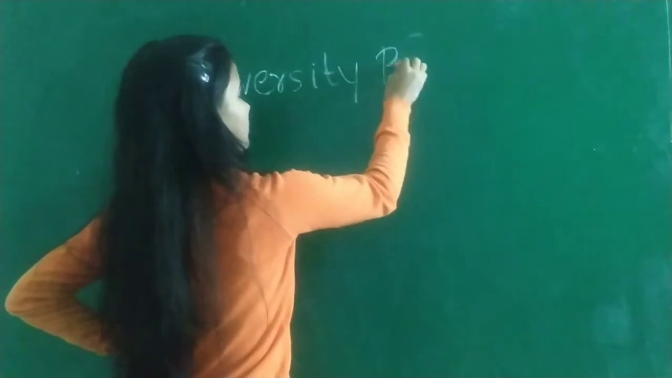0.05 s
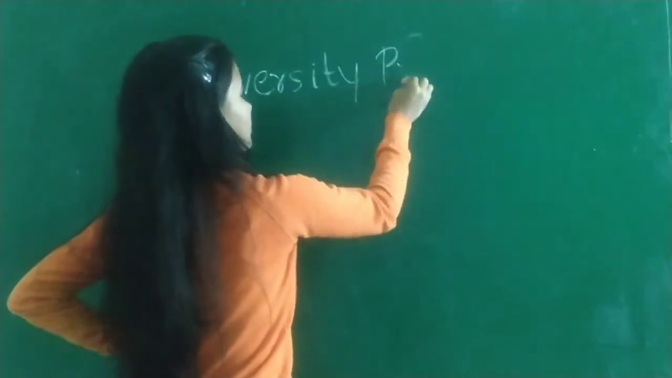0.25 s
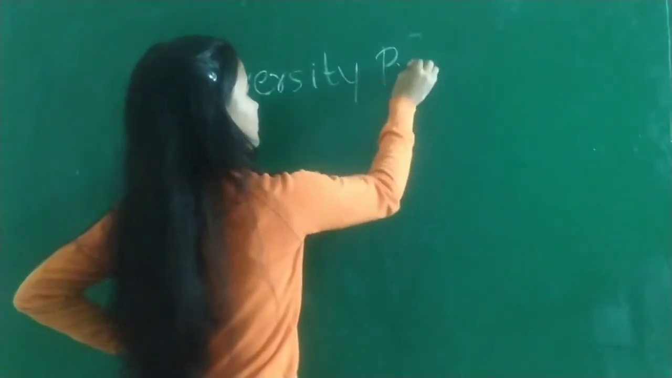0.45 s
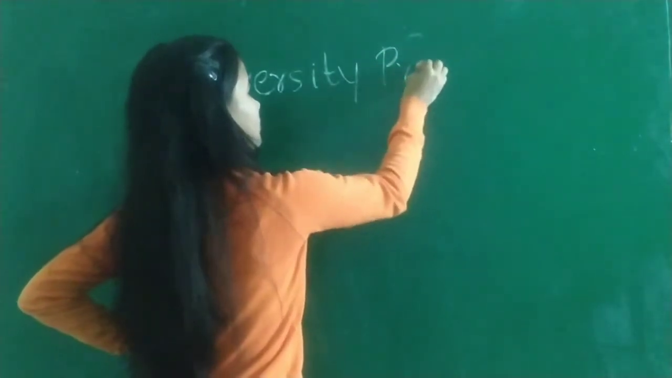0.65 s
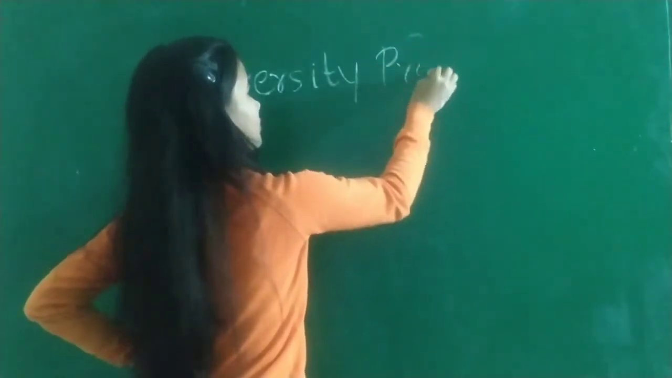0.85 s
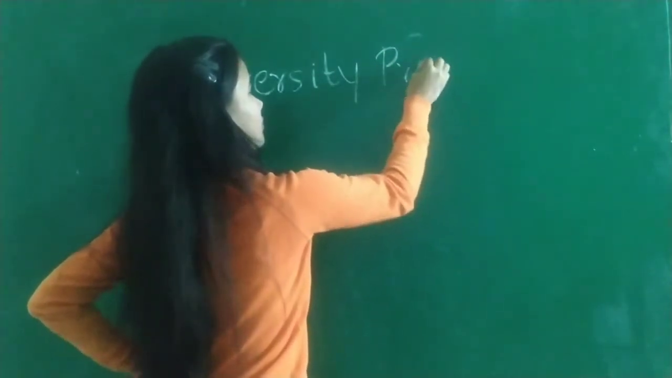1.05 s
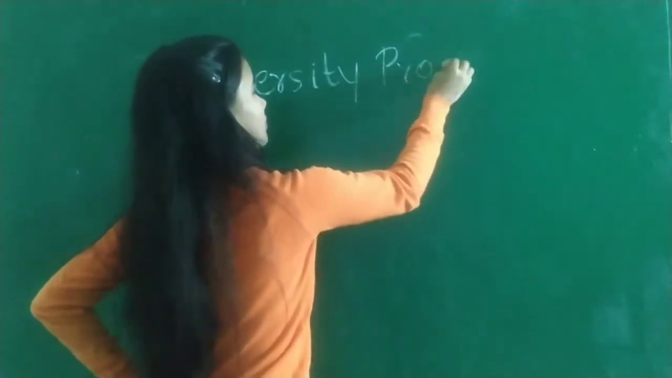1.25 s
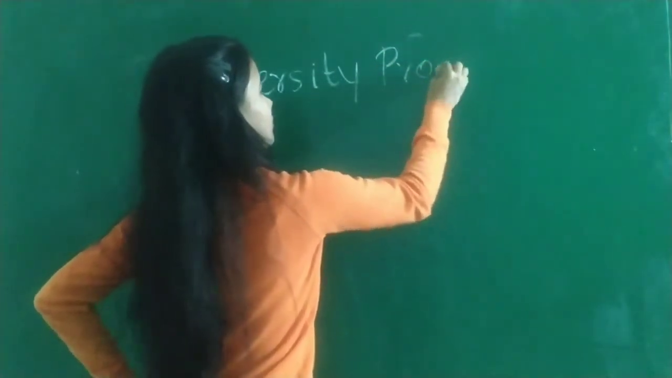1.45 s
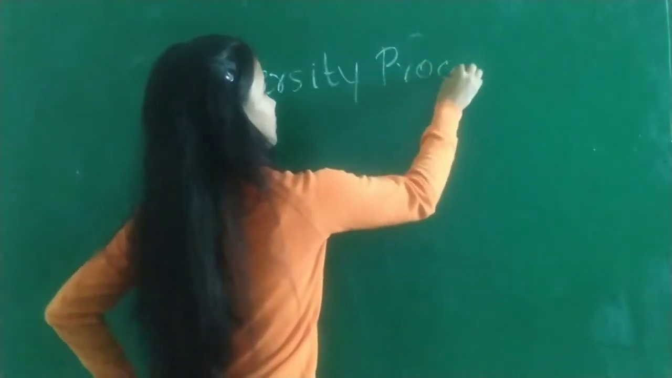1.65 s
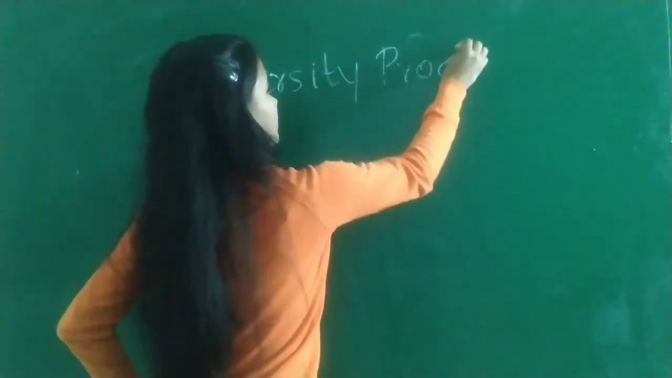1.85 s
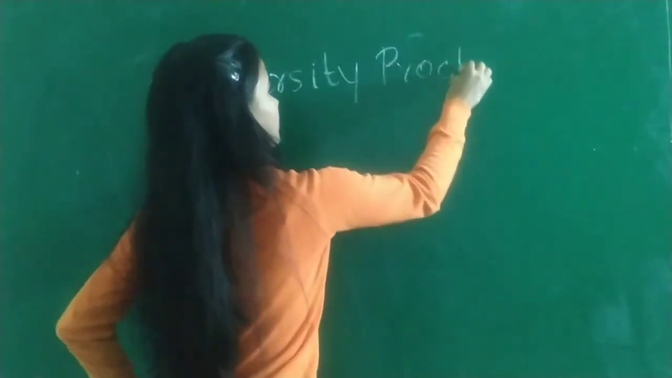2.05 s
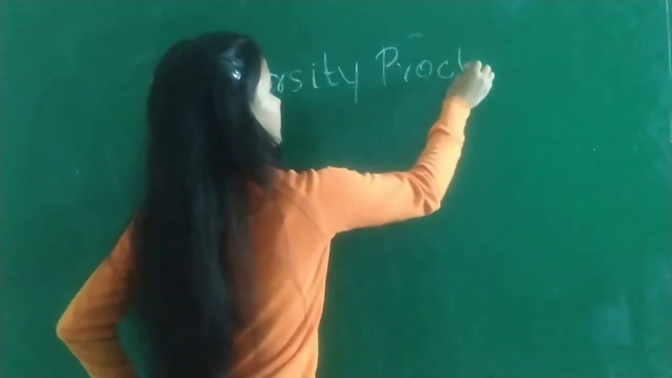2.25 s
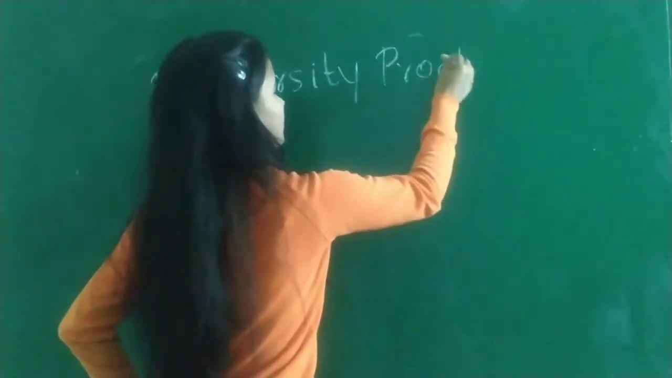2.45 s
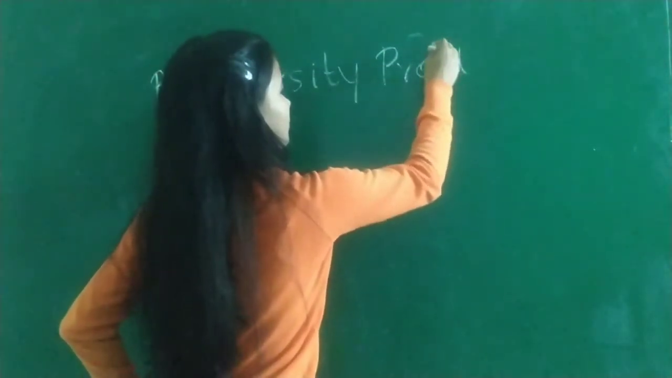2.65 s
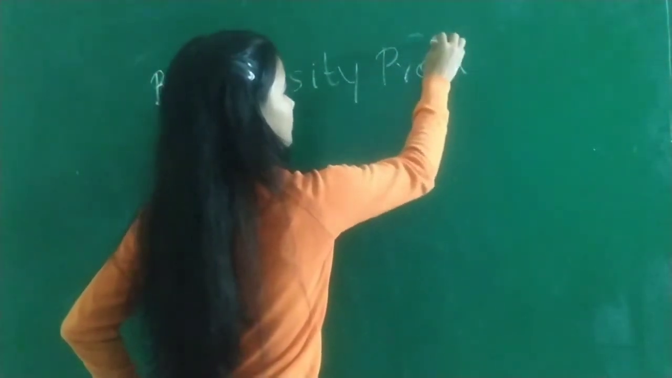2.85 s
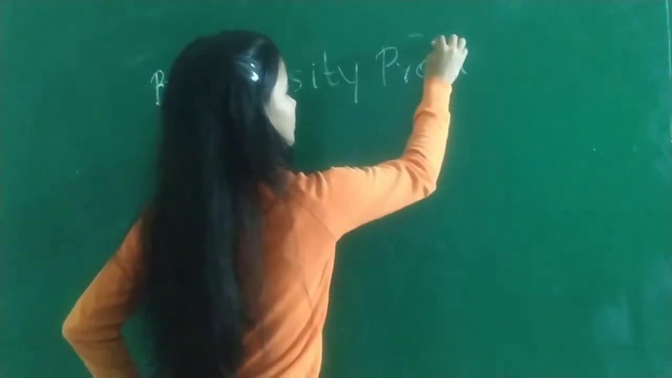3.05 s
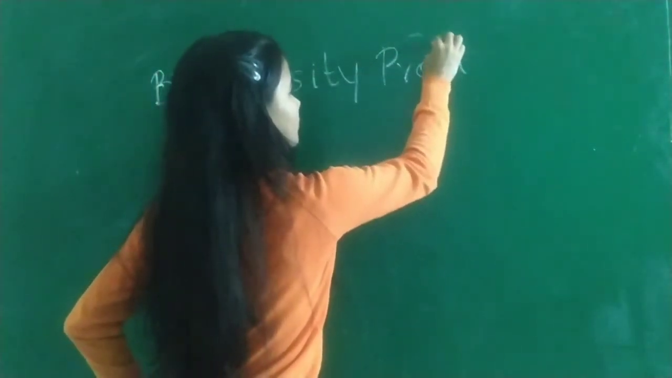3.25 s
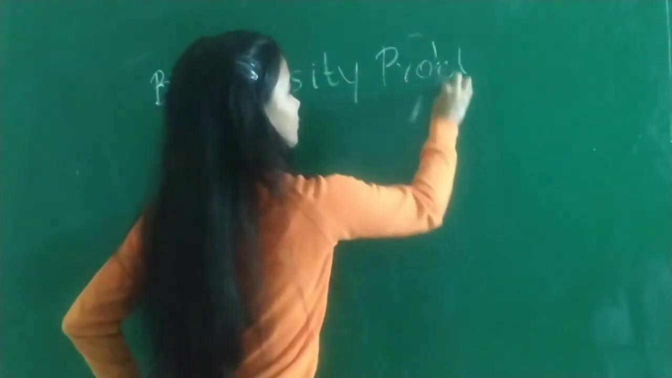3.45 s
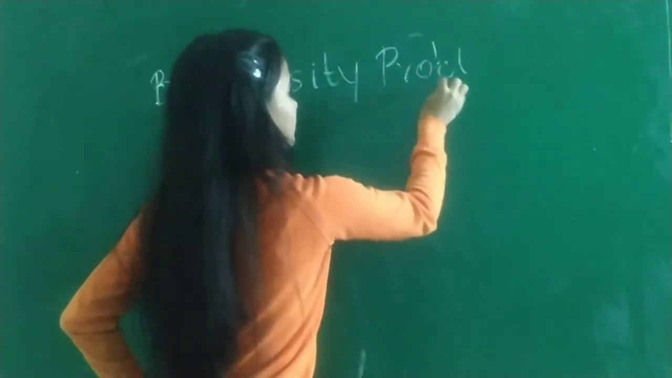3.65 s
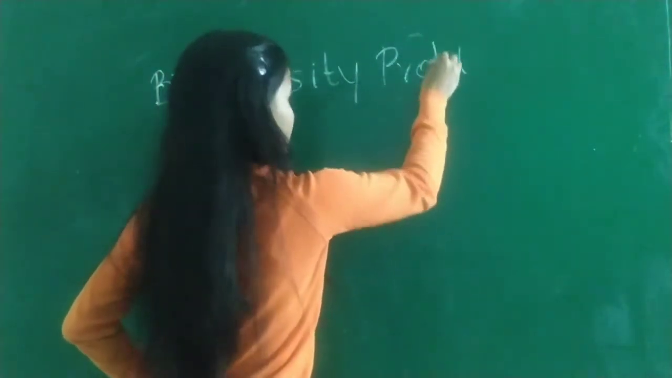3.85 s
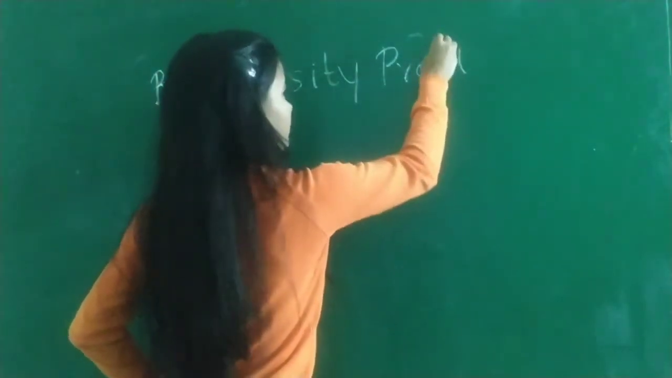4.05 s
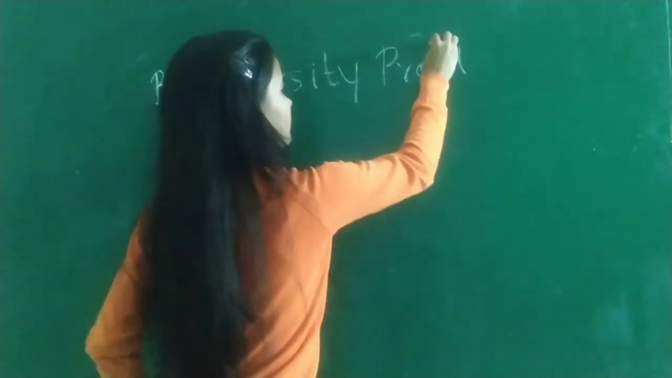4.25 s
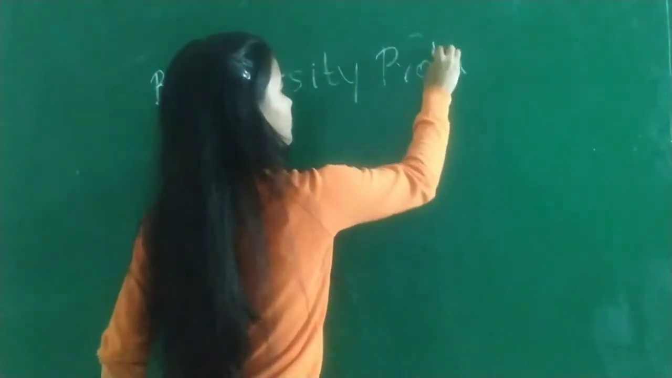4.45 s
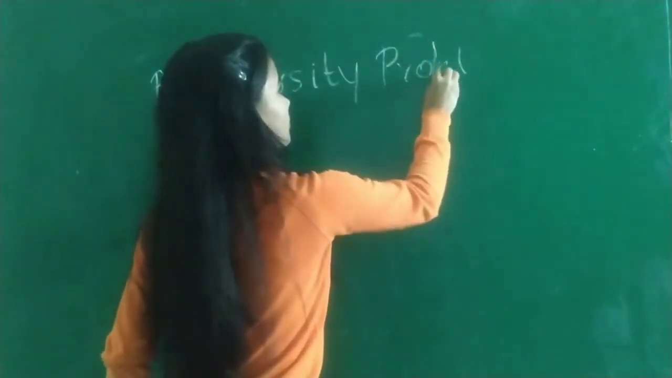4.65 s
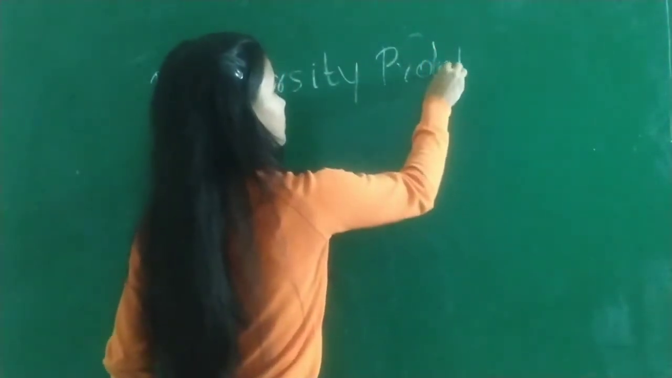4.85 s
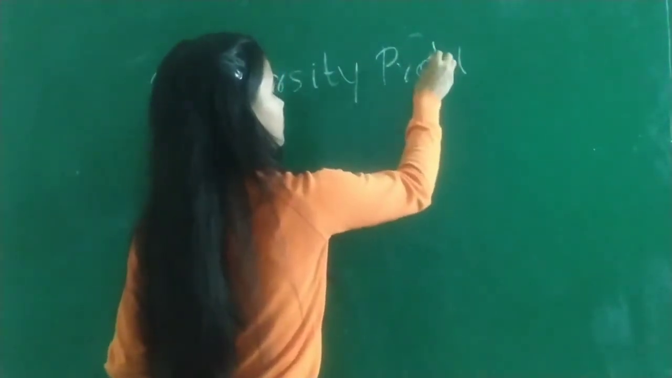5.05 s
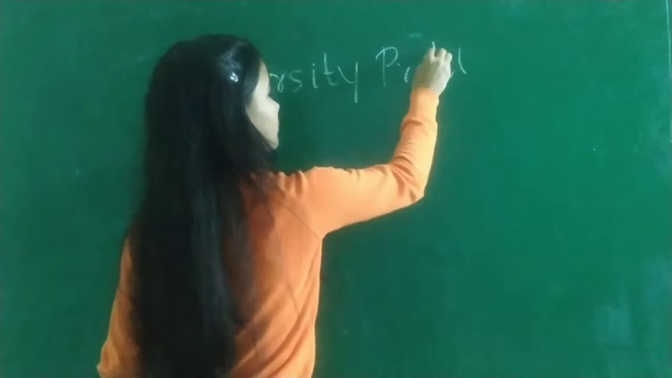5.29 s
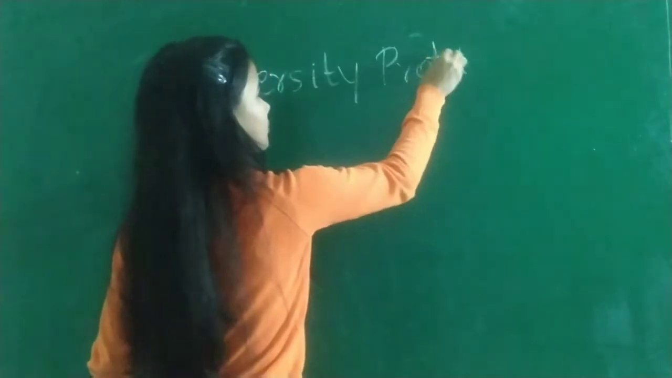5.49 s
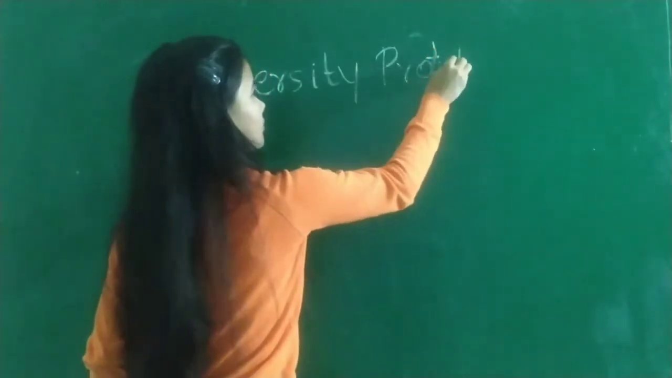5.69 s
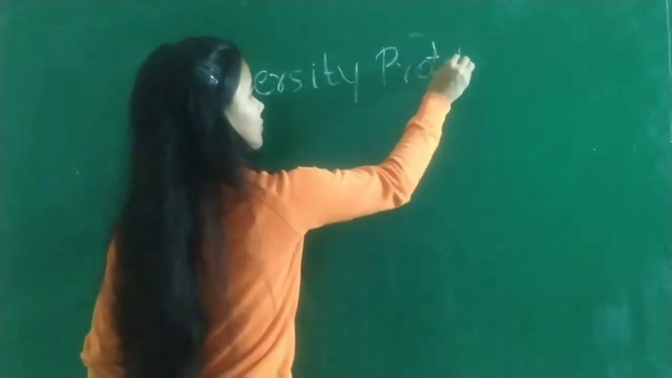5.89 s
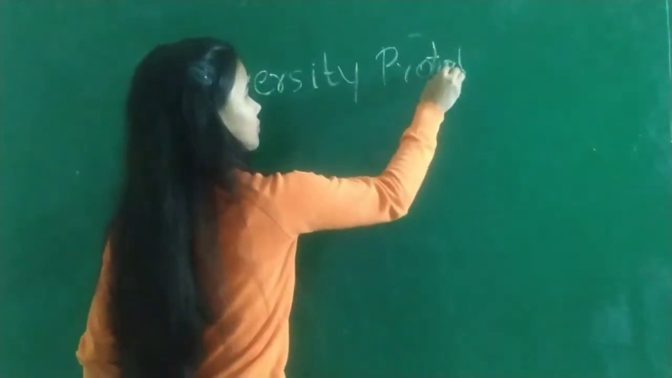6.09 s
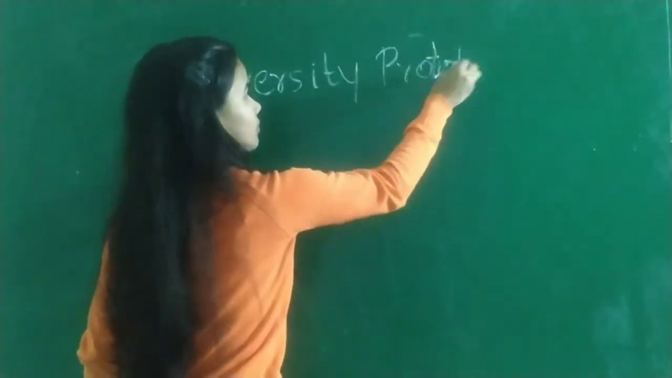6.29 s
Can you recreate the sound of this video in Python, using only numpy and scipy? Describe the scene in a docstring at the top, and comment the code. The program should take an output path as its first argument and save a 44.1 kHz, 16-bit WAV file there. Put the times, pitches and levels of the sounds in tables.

```python
"""In a bare, echoing classroom, chalk writes on a wall-mounted board, heard through one small microphone.
Each stroke lands with a knock and drags with a gritty hiss as tiny grains break off and shake the stick
and the board. The stick snaps, the broken end drops and bounces, and something soft brushes over the board.
Behind it all are far noise, microphone hiss and the faint hum of the room's low resonances."""
import sys
import numpy as np
from scipy import signal
from scipy.fft import rfft, irfft
from scipy.io import wavfile

SR = 44100
rng = np.random.default_rng(int(sys.argv[2]) if len(sys.argv) > 2 else 0)


def log_audio(samples):
    """Write samples as a 16-bit WAV file to the path given in sys.argv[1]."""
    # one column per channel
    frames = np.atleast_2d(samples).T
    # limit to full scale, then quantise
    limited = np.clip(frames, -1, 1)
    pcm = np.round(limited * 32767).astype(np.int16)
    wavfile.write(sys.argv[1], SR, pcm)


N = 278976
BLOW_SAMPLES = 4096
BLOW_MS = np.arange(BLOW_SAMPLES) / SR * 1000   # the time since a blow began

# Chalk hitting the board, the snap included. Each row: start in seconds, knock peak in dB, crack peak in dB,
# contact time in ms, pitch of the struck spot in Hz, its peak in dB, treble lift in dB per octave.
TAPS = [(0.0428, -19, -27.5, 0.057, 1130, -21, 20.5), (0.6310, -19, -24.5, 0.12, 860, -22.5, 24),
        (1.158, -50, -45, 0.045, 1500, -60, 0), (1.2762, -21.5, -39.5, 0.1, 1060, -25, 9),
        (1.705, -48, -47, .05, 1500, -60, 0), (1.8572, -15, -31.5, 0.065, 1300, -16.5, 2.5),
        (2.8063, -52, -54, 0.13, 1500, -65, 0), (2.8745, -24.5, -57, 0.11, 890, -30, 7),
        (3.3815, -15, -25.5, 0.078, 1250, -15, 14), (3.3870, -7, -18, 0.15, 780, -9.5, 8),
        (3.4085, -41, -44, .05, 1100, -45, 0), (4.471, -58, -46, .05, 1500, -56, -2),
        (5.2352, -18.5, -53, 0.13, 745, -27, 5), (5.605, -23.5, -45.5, 0.074, 1080, -29.5, 0)]
# The board's modes, the tones it rings at. Each row: pitch in Hz, width in Hz, relative level in dB.
BOARD_MODES = [(218, 20, -14.5), (334.5, 20, -3), (633, 57, -13), (763, 81, -4.5), (928, 155, -6),
               (1068, 350, 1.5), (1221, 29, 1), (1311, 23, -4.5), (1386, 56, -2), (1518, 39, -1.5),
               (1648, 112, -5.5), (1860, 60, -6), (2024, 59, -6.5), (2360, 57, -13), (2820, 630, -16.5)]


def chalk_strokes():
    """The dragging tip hisses, rings the stick and shakes the board, all unsteady as pressure wavers."""
    # Each row: moment of top speed in seconds, rise and fall in seconds, bright hiss level in dB, then
    # dull scrape, stick and board in dB compared with that hiss, and hardness of contact from 0 to 1.
    strokes = [(0.15, 0.18, 0.13, -61.5, -9, -2, 15.5, 0.7), (0.405, 0.1, 0.051, -59.5, 0, 0, 20, 0.61),
               (0.53, .025, 0.034, -75.5, -1, 5, 6, 0.86), (0.73, 0.15, 0.099, -64, -11, -5, 18.5, 0.43),
               (0.805, 0.067, 0.11, -62.5, -1, 1.5, 12.5, 0.5),
               (0.905, 0.072, 0.069, -58.5, -9, -10, 21, 0.49),
               (0.965, 0.068, 0.08, -63, -7, -1, 26.5, 0.67), (1.085, 0.068, 0.075, -61.5, -4, 2, 10, 0.75),
               (1.162, 0.013, 0.012, -69.5, 9.5, 9, 16, 0.7), (1.31, 0.031, 0.062, -77, -6, 7, 36.5, 0.48),
               (1.453, 0.072, 0.12, -66.5, -10, -3, 22, 0.24),
               (1.566, 0.19, 0.029, -61.5, 2.5, 1, 14.5, 0.7),
               (1.685, 0.16, 0.034, -64, -5.5, -3, 16.5, 0.8), (2.035, 0.16, 0.16, -59, -6, 1, 17, 0.79),
               (3.377, 0.11, 0.033, -58, -18, -4, 10, 0.73),
               (3.411, 0.0073, 0.08, -52.5, -1, -8, 21.5, 0.64),
               (4.49, 0.23, 0.11, -71.5, -3, 2, 14.5, 0.34), (4.585, 0.14, 0.074, -65, 0, 5, 24, 0.3),
               (4.75, 0.073, 0.025, -64.5, -4, 3, 18, 0.4), (5.805, 0.11, 0.036, -71.5, -6, 0, 23.5, 0.8),
               (5.903, 0.03, 0.12, -68.5, 3, 5, 20, 0.53), (6.099, 0.078, 0.056, -65, 1, 6.5, 25, 0.51)]
    # The bright hiss shifts as the tip turns. Each row: time in seconds, pitch in Hz.
    tip_pitch = [(0, 11000), (.19, 11500), (.36, 11800), (.42, 11000), (.72, 11500), (.81, 10300),
                 (.86, 11400), (.91, 11800), (1.0, 11800), (1.08, 11300), (1.16, 10000), (1.31, 11600),
                 (1.44, 12100), (1.52, 11000), (1.58, 9830), (1.62, 10500), (1.7, 12000), (2.0, 12000),
                 (3.4, 10600), (4.45, 11000), (4.6, 10000), (4.75, 11000), (6.33, 11100)]
    # The tones of the dragged stick. Each row: pitch in Hz, width in Hz, relative level in dB.
    stick_modes = [(3570, 3500, 14.5), (5330, 320, -5), (5790, 1350, 8.5), (6940, 1100, 1.5)]
    jolts = grit(per_s=2500, spread_db=2.5) * from_db(2.5 * drift(rate_hz=45.7))
    shaken = radiated(body(np.diff(jolts, prepend=0), BOARD_MODES))
    soft = rms_one(cut(shaken, 1000, "low", order=4))   # a soft drag drives only the low tones
    hard = rms_one(cut(shaken, 2050, "low", order=4))
    dull = double_resonance(catching_grit(per_s=9000), hz=8600, width_hz=6200)
    bright = gliding_resonance(catching_grit(per_s=7600), in_time(tip_pitch), width_hz=4100)
    stick = rms_one(body(body(catching_grit(per_s=12000), stick_modes), stick_modes))
    out = np.zeros(N)
    for top_s, rise_s, fall_s, tip_db, dull_db, stick_db, board_db, hardness in strokes:
        board = (1 - hardness) * soft + hardness * hard
        scrape = bright + from_db(dull_db) * dull + from_db(stick_db) * stick + from_db(board_db) * board
        out += sweep(top_s, rise_s, fall_s, tip_db) * scrape
    return out * from_db(1.6 * drift(rate_hz=20))


def grit(per_s, spread_db):
    """Grains of chalk break off at random moments in uneven sizes."""
    sizes = from_db(spread_db * np.minimum(rng.exponential(1, N), 5)) * rng.choice([-1, 1], N)
    return rms_one(sizes * (rng.random(N) < per_s / SR))


def catching_grit(per_s):
    """Grit whose strength jumps as the tip catches and lets go."""
    return grit(per_s, spread_db=2.0) * from_db(2.2 * drift(rate_hz=16))


def chalk_taps():
    """A brief push knocks the board, a little differently each time; the hard edge cracks in the stick."""
    # The tones of the struck stick. Each row: pitch in Hz, width in Hz, relative level in dB.
    crack_modes = [(3850, 1500, -8), (4970, 250, -6), (5500, 920, -4), (6400, 360, -1), (7120, 540, -4.5),
                   (8100, 1140, -1), (9700, 1700, -5), (11800, 1300, -7.5), (14100, 2500, -13)]
    lift_from_hz = 1400
    out = np.zeros(N)
    for start_s, knock_db, crack_db, contact_ms, _, _, lift_db in TAPS:
        modes = [(hz, width_hz, db + lift_db * max(np.log2(hz / lift_from_hz), 0) + rng.normal(0, 2.5))
                 for hz, width_hz, db in BOARD_MODES]
        add_blow(out, start_s, knock_db, radiated(body(push(contact_ms), modes)))
        crack = 0
        for k, (hz, width_hz, db) in enumerate(crack_modes):
            gain = (-1) ** k * from_db(db + rng.normal(0, 1.5)) / width_hz ** .5
            crack += gain * resonance(BLOW_MS == 0, hz, width_hz)   # rung by a single click
        add_blow(out, start_s, crack_db, crack)
    return out


def spot_ring():
    """The board around each blow rings on briefly, most near the struck spot's own pitch."""
    # The tones of that part of the board. Each row: pitch in Hz, width in Hz.
    spot_modes = [(740, 74), (1080, 61), (1500, 60), (1800, 120), (2215, 43), (2470, 200), (3040, 79),
                  (3650, 110)]
    loss_db_per_octave = 9
    out = np.zeros(N)
    for start_s, _, _, contact_ms, spot_hz, ring_db, _ in TAPS:
        modes = [(hz, width_hz, -loss_db_per_octave * abs(np.log2(hz / spot_hz)))
                 for hz, width_hz in spot_modes]
        add_blow(out, start_s, ring_db, -body(push(contact_ms, lag_ms=0.34), modes))
    return radiated(out)


def falling_piece():
    """The broken end lands and bounces, with a dry ring of its own and a thud from the floor."""
    # Each row: start in seconds, peak in dB, ring pitch in Hz, ring width in Hz, scuff fade time in ms,
    # thud in dB compared with the ring, thud pitch in Hz.
    # The second row is a quick, bright echo of the first landing.
    ticks = [(3.8779, -25.5, 4080, 2480, 0.013, 2.5, 1500), (3.891, -37, 8450, 3000, 0.045, 3, 2500),
             (3.944, -39, 7000, 2500, .3, 11, 990), (3.9985, -43, 5030, 3000, 0.04, 9, 990),
             (4.1733, -34.5, 6600, 1200, 1.5, 4, 860), (4.1977, -48, 6700, 1000, 1.4, 17, 1210),
             (4.2347, -43, 6850, 1000, 1.0, 18, 1190)]
    out = np.zeros(N)
    for start_s, peak_db, hz, width_hz, scuff_ms, thud_db, thud_hz in ticks:
        scuff = rng.standard_normal(BLOW_SAMPLES) * np.exp(-BLOW_MS / scuff_ms)
        ring = rms_one(resonance(resonance(scuff, hz, width_hz), hz, 2 * width_hz))
        thud = double_resonance(BLOW_MS == 0, thud_hz, width_hz=1160)
        add_blow(out, start_s, peak_db, ring + from_db(thud_db) * thud)
    return out


def brush():
    """Something soft rubs the board with a smooth hiss: one bright pass and one duller one."""
    # Each row: moment of top speed in seconds, rise and fall in seconds, gain in dB, centre pitch in Hz.
    passes = [(5.285, 0.17, 0.21, -47.5, 5940), (5.405, 0.072, 0.037, -44, 2640)]
    below_db, above_db = 24, 20   # loss one octave under and over the centre
    out = np.zeros(N)
    for top_s, rise_s, fall_s, gain_db, centre_hz in passes:
        bands = []
        for hz in np.geomspace(1500, 15000, 10):
            loss_db = above_db if hz > centre_hz else below_db
            bands.append((hz, 0.43 * hz, -loss_db * np.log2(hz / centre_hz) ** 2))
        bands.append((centre_hz, .15 * centre_hz, 1))   # a narrower ring at the centre
        out += sweep(top_s, rise_s, fall_s, gain_db) * body(rng.standard_normal(N), bands)
    return out


def first_echoes(x):
    """Each near surface returns a dull copy of the sound, slightly smeared because it is uneven."""
    # The board's edges, then the nearest surfaces. Each row: delay in seconds, level in dB.
    reflections = [(.0009, -6), (.0053, -10.5), (.0088, -4.5), (0.0102, -11.5), (0.0224, -19),
                   (0.0333, -10.5)]
    smear_ms = 1.0
    pattern = np.zeros(2 * BLOW_SAMPLES)
    for delay_s, db in reflections:
        smear = rng.standard_normal(BLOW_SAMPLES) * np.exp(-BLOW_MS / smear_ms)
        pattern[int(delay_s * SR):][:BLOW_SAMPLES] += from_db(db) * energy_one(smear)
    return cut(signal.fftconvolve(x, pattern)[:N], 3400, "low", order=1)


def room_echo(x):
    """Dense echoes build up after the first wall and die away, fastest in the treble."""
    # Each row: pitch in Hz, seconds the echo takes to fade by 60 dB.
    fade_times = [(150, 0.39), (500, 1.0), (1000, 1), (2800, 0.99), (7000, 0.55), (15000, 0.22)]
    first_echo_s, build_up_s, room_db = 0.0075, 0.018, -4
    t = np.arange(int(1.6 * SR)) / SR
    hz, frame_s, spectrum = signal.stft(rng.standard_normal(len(t)), SR, nperseg=512)
    fade = from_db(-60 * frame_s / at_hz(fade_times, hz)[:, None])
    tail = signal.istft(spectrum * fade, SR, nperseg=512)[1][:len(t)]
    tail *= np.clip((t - first_echo_s) / build_up_s, 0, 1)
    return from_db(room_db) * signal.fftconvolve(x, energy_one(tail))[:N]


def background():
    """Far noise and microphone hiss, with a wavering hum at the room's resonances."""
    # The tone of the noise and hiss. Each row: pitch in Hz, relative level in dB.
    noise_shape = [(30, -35), (80, -28.5), (100, -19), (160, -7), (250, -2), (400, -11.5), (630, -11.5),
                   (1000, -17.5), (2000, -23), (4000, -31), (8000, -34.5), (13000, -35), (16000, -33.5)]
    # The room's resonances. Each row: pitch in Hz, width in Hz, base level in dB.
    hum_modes = [(212.9, 51, -58), (327.5, 102, -63.5), (801, 73, -64.5)]
    # The hum swells and sinks. Each row: time in seconds, dB added to the base level.
    hum_swell = [(0, -2.5), (.85, 9), (1.4, 2.5), (2.4, 1), (3.2, -2.5), (3.5, 11.5), (4.5, -3), (5.3, 0),
                 (6.33, 5.5)]
    noise_gain = from_db(at_hz(noise_shape, np.fft.rfftfreq(N, 1 / SR)))
    out = from_db(-55) * rms_one(irfft(rfft(rng.standard_normal(N)) * noise_gain, N))
    for hz, width_hz, db in hum_modes:
        hum = double_resonance(rng.standard_normal(N), hz, width_hz)
        out += from_db(db + in_time(hum_swell) + 1.13 * drift(rate_hz=9.2)) * hum
    return out


def push(contact_ms, lag_ms=0):
    """The force of a blow is one smooth bump: the shorter it is, the brighter the sound."""
    return np.exp(-.5 * ((BLOW_MS - lag_ms) / contact_ms - 2.5) ** 2)


def sweep(top_s, rise_s, fall_s, top_db):
    """The loudness of a movement that gathers speed, peaks and slows again."""
    fade_db, roundness = 17.5, 1.65   # fade_db is lost one rise before or one fall after the peak
    t = np.arange(N) / SR - top_s
    away = np.abs(t) / np.where(t < 0, rise_s, fall_s)
    return from_db(np.maximum(top_db - fade_db * away ** roundness, -200))


def add_blow(out, start_s, peak_db, shape):
    """Adds one blow to out, scaled to the given peak."""
    at = int(start_s * SR)
    out[at:at + len(shape)] += from_db(peak_db) * shape / np.abs(shape).max()


def radiated(x):
    """A thin board sends little bass into the air."""
    return cut(x, 160, "high", order=3)


def body(x, modes):
    """An object rings at all its tones at once."""
    return sum(from_db(db) * resonance(x, hz, width_hz) for hz, width_hz, db in modes)


def resonance(x, hz, width_hz):
    """Rings at one pitch: the narrower the width, the longer the ring."""
    r = np.exp(-np.pi * width_hz / SR)
    feedback = [1, -2 * r * np.cos(2 * np.pi * hz / SR), r * r]
    return signal.lfilter((1 - r * r) / 2 * np.array([1, 0, -1]), feedback, x + 1e-18)


def double_resonance(x, hz, width_hz):
    """The same resonance twice for a sharper focus, scaled to strength 1."""
    return rms_one(resonance(resonance(x, hz, width_hz), hz, width_hz))


def gliding_resonance(x, pitch_hz, width_hz, block=512):
    """A double resonance whose pitch moves in small steps."""
    r = np.exp(-np.pi * width_hz / SR)
    out, state = np.zeros(N), np.zeros((2, 2))
    for i in range(0, N, block):
        section = [1, 0, -1, 1, -2 * r * np.cos(2 * np.pi * pitch_hz[i] / SR), r * r]
        out[i:i + block], state = signal.sosfilt([section, section], x[i:i + block], zi=state)
    return rms_one(out)


def cut(x, hz, keep, order):
    """Keeps the "low" or "high" side of hz; a higher order cuts more steeply."""
    return signal.sosfilt(signal.butter(order, hz, keep, fs=SR, output="sos"), x)


def drift(rate_hz):
    """A smooth random wobble with a typical size of 1."""
    r = np.exp(-2 * np.pi * rate_hz / SR)
    return rms_one(signal.lfilter([1], [1, -2 * r, r * r], rng.standard_normal(N + SR))[SR:])


def in_time(rows):
    """Joins (seconds, value) points with straight lines."""
    return np.interp(np.arange(N) / SR, *np.transpose(rows))


def at_hz(rows, hz):
    """Reads between (Hz, value) points, with octaves evenly spaced."""
    row_hz, values = np.transpose(rows)
    return np.interp(np.log(hz + 1), np.log(row_hz), values)


def from_db(db):
    return 10 ** (np.asarray(db) / 20)


def rms_one(x):
    """Scales a sound to an average strength (rms) of 1."""
    return x / np.sqrt(np.mean(x ** 2) + 1e-20)


def energy_one(x):
    return x / np.sqrt(np.sum(x ** 2))


def scene():
    """Direct sound, echoes and background; left and right differ only a little, in the treble."""
    air_cut_hz = 13000
    blows = cut(chalk_taps() + falling_piece(), air_cut_hz, "low", order=4)
    drag = cut(chalk_strokes(), air_cut_hz, "low", order=4)
    brushing = brush()
    direct = blows + drag + brushing + spot_ring()
    into_room = blows + from_db(-2) * drag + brushing   # the drag stirs the room less than a blow
    middle = direct + first_echoes(into_room) + room_echo(into_room) + background()
    widener = energy_one(rng.standard_normal(400))   # left and right differ faintly in the highest treble
    side = cut(signal.fftconvolve(middle, widener)[:N], 13800, "high", order=3)
    return middle + from_db(-10.5) * side * [[1], [-1]]


def record(dry):
    """The highest treble is cut off steeply."""
    cutoff_hz = 15760
    return signal.sosfilt(signal.ellip(14, .5, 60, cutoff_hz, fs=SR, output="sos"), dry)


dry = scene()
out = record(dry)
log_audio(out)
```